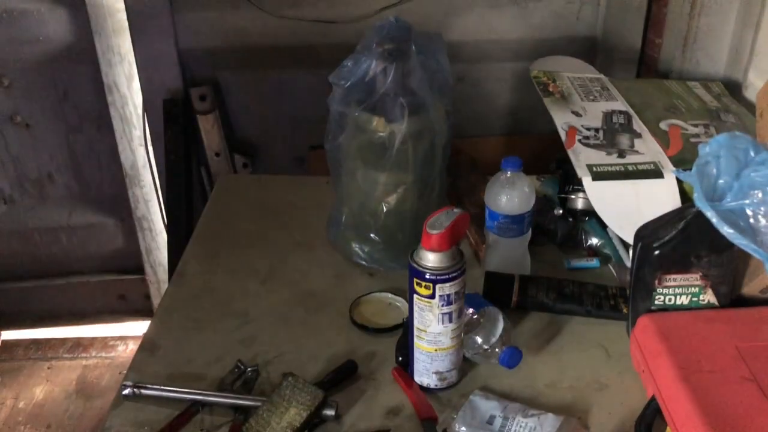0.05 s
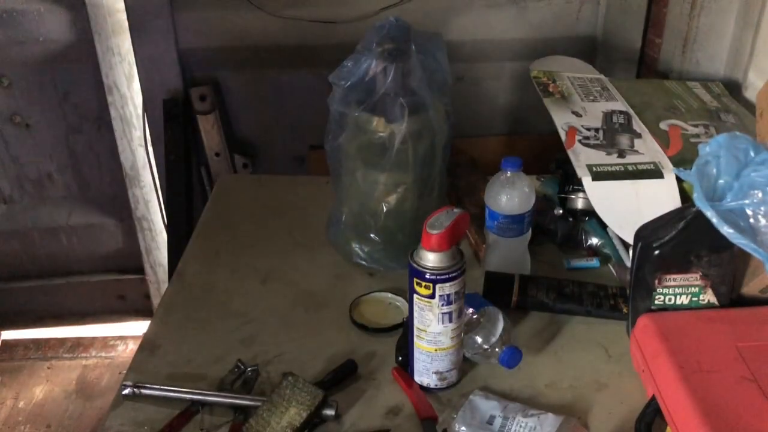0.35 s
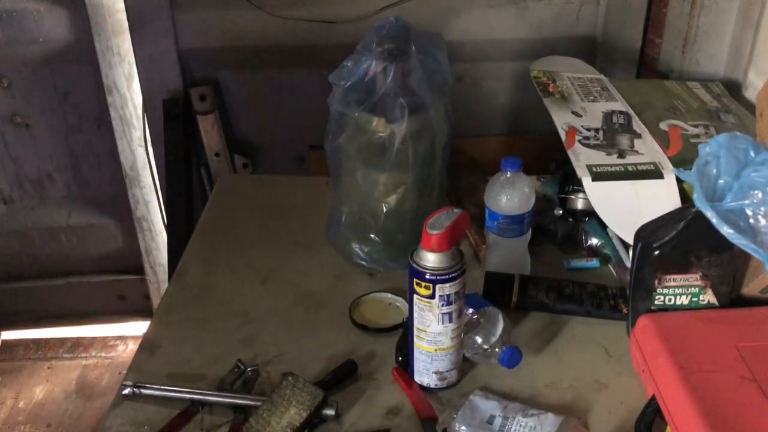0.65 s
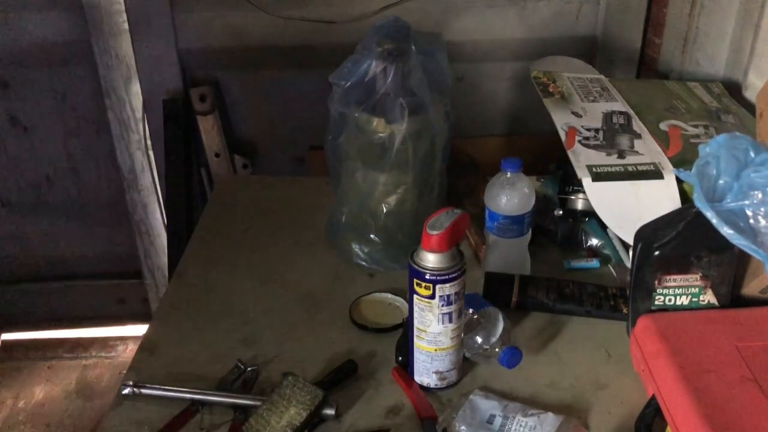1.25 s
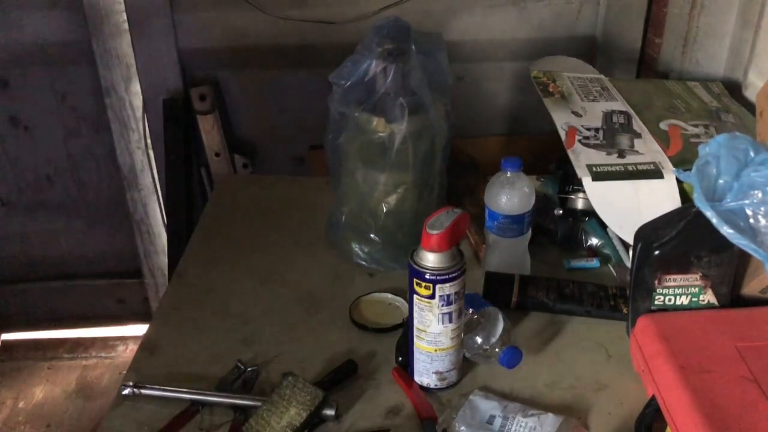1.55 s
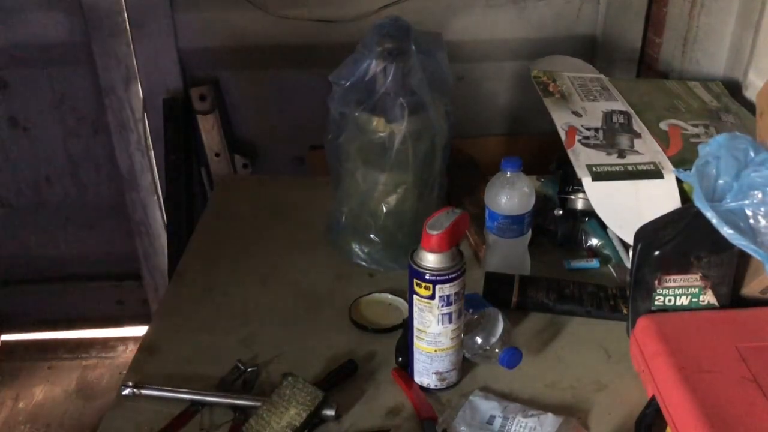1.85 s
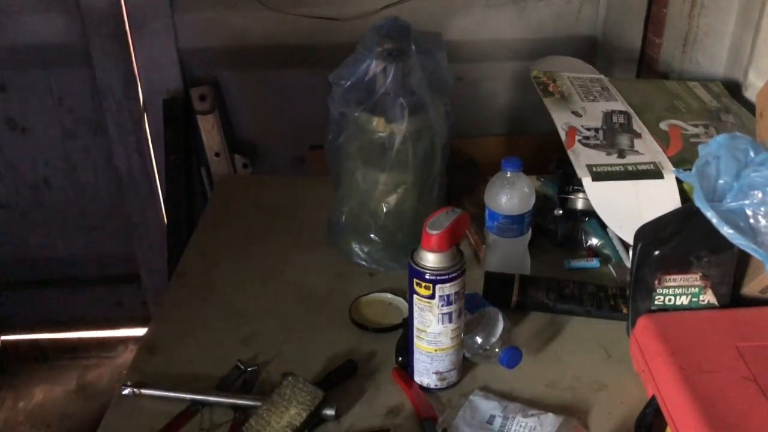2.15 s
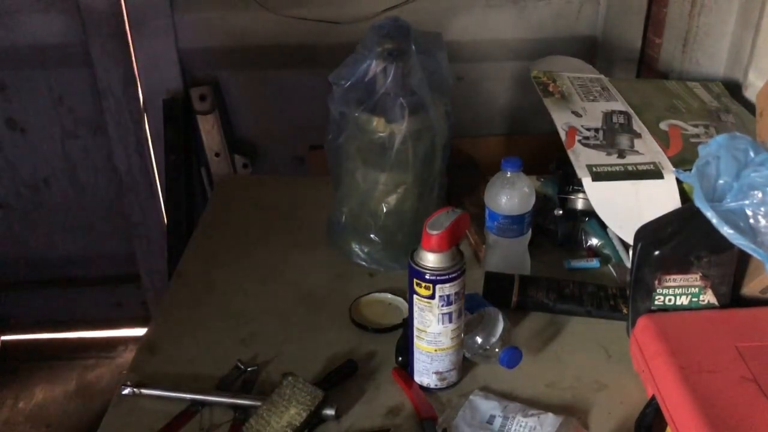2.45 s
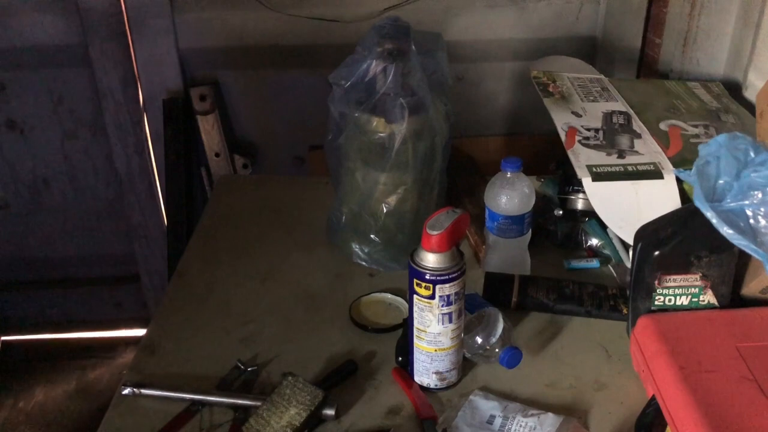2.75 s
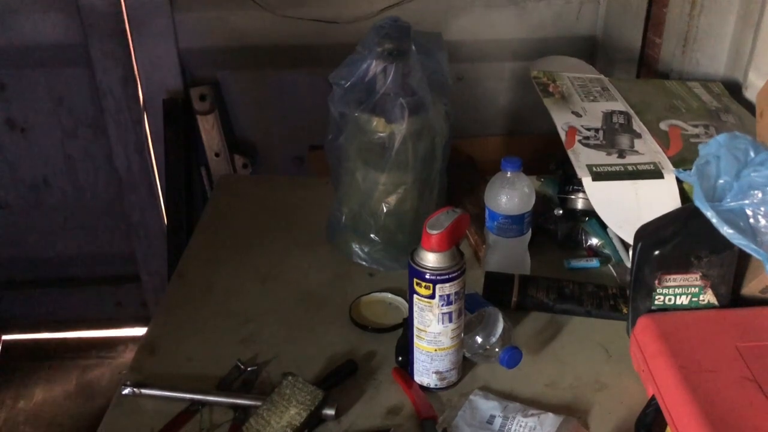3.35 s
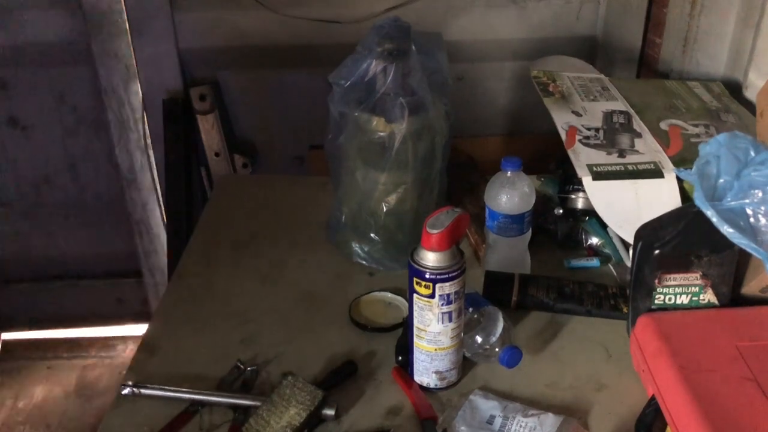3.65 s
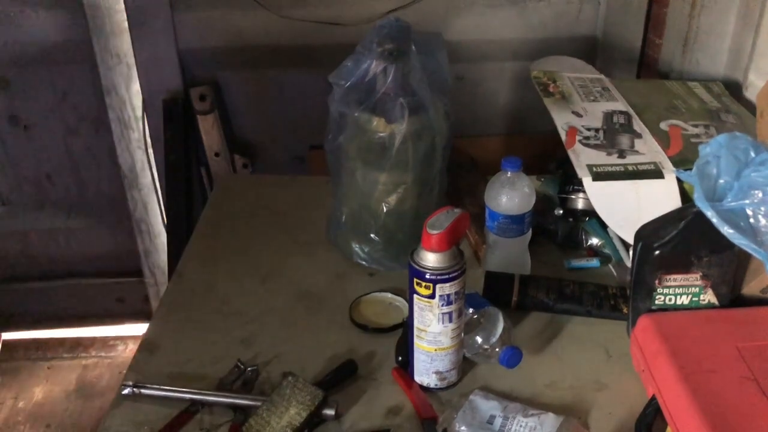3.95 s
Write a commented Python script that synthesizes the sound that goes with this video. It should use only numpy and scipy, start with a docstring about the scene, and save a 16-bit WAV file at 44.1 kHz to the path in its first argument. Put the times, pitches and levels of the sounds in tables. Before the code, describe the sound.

A metal shed door creaks in separate slips, knocks as it flexes and clanks closed with small latch clicks. It then reopens with low pops, a rough drag and a shuddering groan, above a quiet background rumble.

```python
"""A sheet-metal shed door

The door swings slowly shut and open again beside a workbench. Its hinge creaks in separate slips,
and its panel knocks and pops as it flexes. Loose fittings clank and the latch clicks against the
frame. Then the door groans twice, drags and shudders as it catches and lets go.
A low rumble and a faint hiss lie underneath."""
import sys
import numpy as np
from scipy import signal
from scipy.io import wavfile
from scipy.ndimage import uniform_filter1d

SR = 44100
rng = np.random.default_rng(int(sys.argv[2]) if len(sys.argv) > 2 else 0)


def persist_wave(psi):
    """Save psi, clipped to +-1, as 16-bit WAV."""
    counts = np.round(np.clip(psi, -1, 1) * 32767).astype(np.int16)
    wavfile.write(sys.argv[1], SR, np.atleast_2d(counts).T)


N = 176400   # samples in the scene: 4 seconds
RING_N = 35000   # samples in one ring: about 0.8 seconds
BAND_HZ = 25 * 2 ** (np.arange(29) / 3)   # centres of the noise bands, three to an octave
CUTOFF_HZ = 16000

# The panel's knocks. Each row: start in seconds, level in dB, extra bass in dB,
# brightness in Hz, build-up in seconds.
KNOCKS = [(0.094, -52.5, 18.5, 900, 0.011), (.235, -48, 10.5, 1180, 0.012), (0.391, -47, 10.5, 990, 0.014),
          (.51, -45, 13, 780, 0.012), (.868, -45, 4, 1060, 0.0081), (.95, -41.5, 1.5, 2240, 0.0063),
          (1.04, -41, -6, 585, 0.015), (1.096, -38, 3.5, 2340, 0.005), (1.248, -36.5, -1, 1860, 0.0028),
          (1.277, -41.5, -5, 1980, 0.0036), (1.346, -46, 10, 1130, 0.013), (1.403, -39.5, 8.5, 2600, 0.011),
          (1.486, -46, 3.5, 1460, 0.0074), (1.55, -39, -25, 1220, 0.018), (1.586, -34, -5, 5100, 0.013),
          (1.643, -35, -1, 6300, 0.012), (1.722, -39.5, 6.5, 1300, 0.012), (1.785, -43, 7, 1590, 0.0032),
          (1.85, -48, 3, 990, 0.012), (1.901, -46.5, -37, 1630, 0.0066), (2.03, -41.5, 8, 840, 0.042),
          (2.454, -53.5, 5, 1420, 0.0055), (2.540, -45.5, -7, 4330, 0.0038),
          (2.550, -41, -24, 2220, 0.0018), (2.843, -50, 7, 250, 0.015), (3.070, -48, -7, 750, 0.0028),
          (3.218, -45.5, -2, 2500, 0.002), (3.33, -43, 12.5, 1500, 0.0069), (3.979, -46, 9, 870, 0.0051)]
# The hinge's slips. Each row: start in seconds, low ring in dB, bright ring in dB, brightness in Hz.
SLIPS = [(0.115, -28.5, -55.5, 2480), (.136, -31, -45, 5200), (0.159, -32.5, -52.5, 5900),
         (.208, -21, -40.5, 8700), (.359, -26.5, -52.5, 5070), (0.373, -53, -54, 7500),
         (.404, -32, -84, 2500), (0.425, -28.5, -79, 2480), (0.456, -30, -64, 1990),
         (0.482, -30, -54.5, 2350), (0.505, -29.5, -56.5, 2930), (0.525, -34.5, -61.5, 5000),
         (0.556, -45, -59, 2980), (0.794, -28, -53, 3000), (.820, -43, -58.5, 9700),
         (0.844, -35.5, -64, 2000)]
# The panel's pops. Each row: start in seconds, level in dB, centre pitch in Hz.
POPS = [(1.251, -37.5, 1140), (1.254, -37, 405), (1.729, -34, 380), (2.553, -40, 910), (2.85, -48, 243),
        (3.111, -38.5, 333), (3.132, -23.5, 115), (3.196, -25, 215), (3.221, -30, 430), (3.258, -22, 96),
        (3.335, -40, 330)]
# Two loose fittings. Each row: level in dB, build-up in seconds, buzz depth in dB, ring time in seconds.
# A ring time (t60) is how long a sound takes to fade by 60 dB.
CLANKS = [(-35, 0.011, 4, .23), (-38, .003, 4.5, 0.34)]
# The latch's clicks. Each row: start in seconds, level in dB, ping in dB relative to that level,
# build-up in seconds.
CLICKS = [(1.96, -52.5, -8, 0.0093), (1.974, -52, -15.5, 0.002), (2.0234, -48.5, -10, 0.0011),
          (2.052, -49.5, -6, 0.0025), (2.082, -59, 5, 0.0046), (2.0951, -43, -19, 0.00085),
          (2.747, -54, -19, 0.0026), (2.8165, -47, 0, 0.00022), (3.328, -59, 3, 0.0078),
          (3.844, -61.5, -18, 0.0035)]

# Modes are the clear tones a part rings with. Each row: pitch in Hz, level in dB.
PANEL_MODES = [(62, -14), (140, -2), (186, -13), (243, -10.5), (300, -3.5), (350, -12.5), (404, -6),
               (497, -12), (650, -8), (735, -16.5), (826, -1), (866, -8.5), (1066, -10), (1250, -19),
               (1400, -10), (1565, -11.5), (1712, -18), (1880, -9), (2300, -12.5)]
HINGE_MODES = [(608, 2.5), (1150, -13), (1416, 4), (1857, -2.5), (2105, -6), (2235, -8), (2444, -1),
               (2785, -2), (2977, -7.5), (3575, -13), (4081, -9), (4200, -6), (4450, -12), (4657, -7),
               (5959, -11), (6444, -7), (6650, -12)]
MOUNT_MODES = [(290, -16), (360, -0.5), (398, -3.5), (470, -22)]
FIRST_CLANK_MODES = [(1040, 2), (1160, 7), (1240, -6), (2210, -7), (2800, -7), (3970, -8), (4250, -8),
                     (4750, -14), (4900, -11), (5100, -9), (5400, -11), (5700, -15), (9500, -16),
                     (9900, -21)]
SECOND_CLANK_MODES = [(1254, 7.5), (1720, -2), (1940, -4), (2440, -3.5), (2540, -6.5), (3170, -8.5),
                      (3360, -11), (4190, -14.5), (5950, -11), (6510, -27), (8100, -16), (8610, -16)]
LATCH_MODES = [(1170, -4), (2340, -17), (2600, -0.5), (2660, -2), (4800, -7), (5930, -10), (8620, -13)]
# How each part's noisy ring starts out. Each row: frequency in Hz, level of the band there in dB.
PANEL_SPECTRUM = [(30, -24), (50, -25.5), (72, -1.5), (108, -13), (140, 0.5), (200, -14), (380, -0.5),
                  (550, -5), (1050, -3.5), (1700, -7.5), (3000, -8), (5000, -10.5), (9000, -8.5),
                  (15000, -6)]
HINGE_SPECTRUM = [(250, -6), (600, -2.5), (1050, -1.5), (1500, -4), (2500, -1), (3400, -11), (4200, -3),
                  (5200, -20), (6500, -2), (10000, -5), (15000, -8)]
LATCH_SPECTRUM = [(400, -11.5), (1300, -11.5), (2100, -11), (3000, -1.5), (4000, -6), (6300, 2),
                  (9000, -2.5), (15000, -10.5)]
# How that ring dies away. Each row: frequency in Hz, ring time in seconds.
PANEL_DECAY = [(70, 1), (150, 1), (400, 0.53), (1100, 0.59), (3000, 0.22), (10000, 0.26)]
HINGE_DECAY = [(400, 0.37), (2000, 0.32), (10000, 0.14)]
LATCH_DECAY = [(1000, 0.66), (3000, 0.37), (7000, 0.19), (15000, 0.24)]

# The course of each groan. Each row: time in seconds, slips per second, level in dB.
SHORT_GROAN = [(2.845, 285, -60), (2.875, 282, -42), (2.93, 292, -49.5), (3.0, 280, -58)]
LONG_GROAN = [(3.6, 140.6, -47), (3.63, 134.1, -26), (3.687, 142.8, -30), (3.715, 147.2, -21.5),
              (3.738, 146.4, -19.5), (3.776, 145.4, -31.5), (3.842, 152.5, -32), (3.89, 154, -39.5),
              (4.0, 136.5, -40)]
GROAN_HARMONICS_DB = [-1, -14, -20.5, -30, -41]   # at 1, 2, 3, 4 and 5 times the slip rate
# The course of the first drag and of the shudder after it. Each row: time in seconds, level in dB.
DRAG = [(3.02, -51), (3.074, -40.5), (3.105, -35), (3.134, -27), (3.222, -24), (3.27, -24.5), (3.316, -32),
        (3.36, -30.5), (3.43, -39.5), (3.6, -43)]
SHUDDER = [(3.6, -68), (3.61, -44), (3.626, -39), (3.652, -41), (3.708, -25.5), (3.748, -21), (3.762, -26),
           (3.979, -38.5)]
# Each noise's colour, or balance of low and high. Each row: frequency in Hz, level per Hz in dB.
BACKGROUND_COLOUR = [(28, -28), (50, -5.5), (86, -4), (164, -5.5), (260, -12), (289, -5.5), (433, -24),
                     (684, -15.5), (826, -20), (945, -28), (1110, -12), (1450, -36), (1660, -18.5),
                     (1800, -26), (2850, -31), (8350, -39), (15500, -57.5)]
DRAG_COLOUR = [(30, -37), (60, -0.5), (97, -5.5), (131, 2), (161, -6), (357, -4), (507, -12.5),
               (829, -17.5), (3000, -34.5), (3880, -47), (8000, -66), (17600, -120)]
SHUDDER_COLOUR = [(30, -5), (58, 0), (95, 0), (170, 3), (290, -1.5), (450, -6), (700, -12), (1000, -12.5),
                  (1500, -22), (2500, -28.5), (4000, -36.5), (8000, -50)]

TIME, RING_TIME = np.arange(N) / SR, np.arange(RING_N) / SR   # in seconds


def from_db(db):
    """Turn decibels into a gain to multiply by."""
    return 10 ** (np.asarray(db) / 20)


def rms_one(x):
    """Scale a signal so that its average strength (rms) is 1."""
    return x / np.sqrt(np.mean(x ** 2, axis=-1, keepdims=True) + 1e-20)


def at_bands(points):
    """Look up a table's value at each noise band, one row a band."""
    hz, value = np.transpose(points)
    return np.interp(np.log(BAND_HZ), np.log(hz), value)[:, None]


def level(curve):
    """Gain that follows a table's last column over time and fades out beyond its ends."""
    times, *_, db = np.transpose(curve)
    outside_s = np.maximum(times[0] - TIME, 0) + np.maximum(TIME - times[-1], 0)
    return from_db(np.interp(TIME, times, db)) * np.exp(-outside_s / .02)


def drift(per_s):
    """Glide from one random value to the next, per_s times a second."""
    return np.interp(TIME * per_s, np.arange(4000), rng.standard_normal(4000))


def noise_bands(evenness=0.27):
    """Split noise into equally strong bands and partly smooth out their swells."""
    white = rng.standard_normal((2, N + 2 * RING_N))
    half_band = 2 ** (1 / 6)
    bands = np.zeros((len(BAND_HZ), N + RING_N))
    for k, hz in enumerate(BAND_HZ):
        band_pass = signal.butter(2, [hz / half_band, hz * half_band], "band", fs=SR, output="sos")
        bands[k] = signal.sosfilt(band_pass, white[k % 2])[RING_N:]
    swell = np.abs(uniform_filter1d(bands ** 2, size=1500)) + 1e-12
    return rms_one(bands / swell ** evenness)


def coloured(bands, colour):
    """Mix the bands into steady noise of a given colour."""
    gains = from_db(at_bands(colour))[:, 0] * np.sqrt(BAND_HZ)   # higher bands are wider
    return rms_one(gains @ bands[:, :N])


def softness(hz, edge_hz):
    """A soft contact leaves out the frequencies above edge_hz."""
    return 1 / np.sqrt(1 + (hz / edge_hz) ** 6)


def rise(seconds):
    """A contact builds up smoothly from silence."""
    return 1 - np.exp(-(RING_TIME / seconds) ** 2)


def crack(db, seconds):
    """A brief boost gives a blow its first snap."""
    return 1 + from_db(db) * np.exp(-RING_TIME / seconds)


def chatter(depth_db, per_s):
    """The uneven gain of a part that rattles in its seat while it rings."""
    return rms_one(from_db(depth_db * np.tanh(drift(per_s)[:RING_N])))


def band_fades(spectrum, decay):
    """After a blow, each band fades at its own speed."""
    return from_db(at_bands(spectrum) - 60 * RING_TIME / at_bands(decay))


def dense_ring(bands, fades, gains):
    """Countless close modes blur into fading noise, each band holding its share of the energy."""
    offset = rng.integers(N)
    ring = bands[:, offset:offset + RING_N] * fades
    share = np.sqrt(np.sum(fades ** 2, axis=1) / np.sum(ring ** 2, axis=1))
    return (gains * share) @ ring


def mode_ring(modes, t60, edge_hz=CUTOFF_HZ):
    """Clear tones ring and fade, each wavering against a weaker twin close to its pitch."""
    hz, db = np.transpose(modes)
    gains = from_db(db + rng.standard_normal(len(hz))) * softness(hz, edge_hz)   # no two blows alike
    signs = (-1) ** np.arange(len(hz))
    twin_hz = hz * (1 + 0.01237 * rng.standard_normal(len(hz)))
    tones = np.sin(2 * np.pi * hz[:, None] * RING_TIME)
    twins = from_db(-1.5) * np.cos(2 * np.pi * twin_hz[:, None] * RING_TIME)
    return (gains * signs) @ (tones + twins) * from_db(-60 * RING_TIME / t60)


def add(out, start_s, sound):
    """Mix a sound in at its start time."""
    i = int(start_s * SR)
    out[i:i + len(sound)] += sound[:N - i]


def background():
    """Steady noise makes a low rumble with a faint hiss."""
    return from_db(-45.5) * coloured(noise_bands(), BACKGROUND_COLOUR)


def panel_knocks():
    """The sheet knocks as it flexes; the ringing spreads over it and dies."""
    out, bands, fades = np.zeros(N), noise_bands(), band_fades(PANEL_SPECTRUM, PANEL_DECAY)
    bass_share = softness(BAND_HZ, edge_hz=330) ** 2
    for start_s, db, bass_db, edge_hz, build_s in KNOCKS:
        gains = softness(BAND_HZ, edge_hz) * from_db(bass_db * bass_share)
        thud = dense_ring(bands, fades, gains) * crack(db=2, seconds=0.0078)
        tones = mode_ring(PANEL_MODES, t60=0.34, edge_hz=edge_hz)
        add(out, start_s, from_db(db) * (thud + tones) * rise(build_s))
    return out


def hinge_creak(bands):
    """Each slip rings the bright steel hinge and the low modes of its mount."""
    out, fades = np.zeros(N), band_fades(HINGE_SPECTRUM, HINGE_DECAY)
    for start_s, low_db, bright_db, edge_hz in SLIPS:
        steel = dense_ring(bands, fades, softness(BAND_HZ, edge_hz))
        steel += mode_ring(HINGE_MODES, t60=0.28, edge_hz=edge_hz) * chatter(depth_db=2, per_s=250)
        mount = mode_ring(MOUNT_MODES, t60=0.11)
        add(out, start_s, from_db(bright_db) * steel * rise(seconds=0.0017))
        add(out, start_s, from_db(low_db) * mount * rise(seconds=0.01))
    return out


def panel_pops():
    """The sheet snaps through or jolts on the frame; where it bends decides which modes ring."""
    out, hz = np.zeros(N), np.transpose(PANEL_MODES)[0]
    for start_s, db, centre_hz in POPS:
        mode_db = -19 * np.log2(hz / centre_hz) ** 2   # 19 dB weaker one octave from the centre
        ring = mode_ring(np.transpose([hz, mode_db]), t60=0.25)
        add(out, start_s, from_db(db) * ring * rise(seconds=0.0089))
    return out


def fitting_clanks(starts_s=(1.591, 1.643)):
    """Two loose fittings clank and buzz against the door; the first builds up more slowly, the next is struck
    sharply and rings out longer."""
    out, fittings = np.zeros(N), (FIRST_CLANK_MODES, SECOND_CLANK_MODES)
    for start_s, (db, build_s, buzz_db, t60), modes in zip(starts_s, CLANKS, fittings):
        ring = mode_ring(modes, t60) * chatter(buzz_db, per_s=900)
        add(out, start_s, from_db(db) * ring * rise(build_s))
    return out


def latch_clicks(bands):
    """Small, hard contacts with the frame each give a snap and a short, bright ping."""
    out, fades = np.zeros(N), band_fades(LATCH_SPECTRUM, LATCH_DECAY)
    for start_s, db, ping_db, build_s in CLICKS:
        snap = dense_ring(bands, fades, gains=0.87) * crack(db=-1.5, seconds=0.0039)
        ping = from_db(ping_db) * mode_ring(LATCH_MODES, t60=0.24)
        add(out, start_s, from_db(db) * (snap + ping) * rise(build_s))
    return out


def panel_groan(curve, jitter=0.0174, flutter_db=1.5):
    """The panel sticks and slips in step with one of its low modes, which makes a rough note."""
    times, slip_hz, _ = np.transpose(curve)
    pitch_hz = np.interp(TIME, times, slip_hz) * (1 + jitter * drift(per_s=70))
    phase = 2 * np.pi * np.cumsum(pitch_hz) / SR
    note = sum(from_db(db + flutter_db * drift(per_s=50)) * np.cos(k * phase)
               for k, db in enumerate(GROAN_HARMONICS_DB, start=1))
    return level(curve) * rms_one(note)


def edge_drag(bands, curve, colour, dull_hz=4500, mode_width_hz=3.2):
    """The door's soft edge catches and lets go unevenly, shaking the modes of the sheet."""
    rub = coloured(bands, colour) * from_db(drift(per_s=120))   # jolts of about 1 dB
    rub = signal.sosfilt(signal.butter(2, dull_hz, fs=SR, output="sos"), rub)
    resonances = [signal.iirpeak(hz, hz / mode_width_hz, fs=SR) for hz, _ in PANEL_MODES]
    sheet = sum(signal.lfilter(b, a, rub) for b, a in resonances)
    return from_db(-1.5) * level(curve) * rms_one(rub + from_db(7.5) * sheet)


def scene():
    """Mix the door's sounds and the background into one channel."""
    bands = noise_bands()
    mix = edge_drag(bands, DRAG, DRAG_COLOUR) + edge_drag(bands, SHUDDER, SHUDDER_COLOUR)
    mix += panel_groan(SHORT_GROAN) + panel_groan(LONG_GROAN)
    mix += background()
    mix += hinge_creak(bands) + panel_knocks() + panel_pops() + fitting_clanks() + latch_clicks(bands)
    return mix[None]


def record(dry):
    """Cut away the highest treble with a steep filter."""
    return signal.sosfilt(signal.ellip(10, .1, 80, CUTOFF_HZ, fs=SR, output="sos"), dry)


dry = scene()
out = record(dry)
persist_wave(out)
```